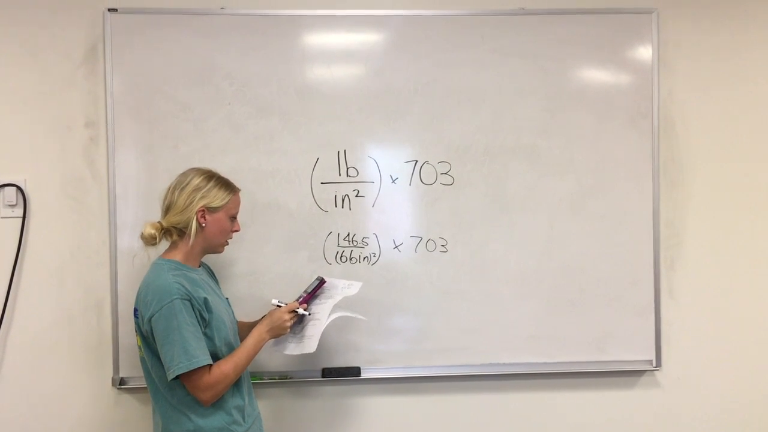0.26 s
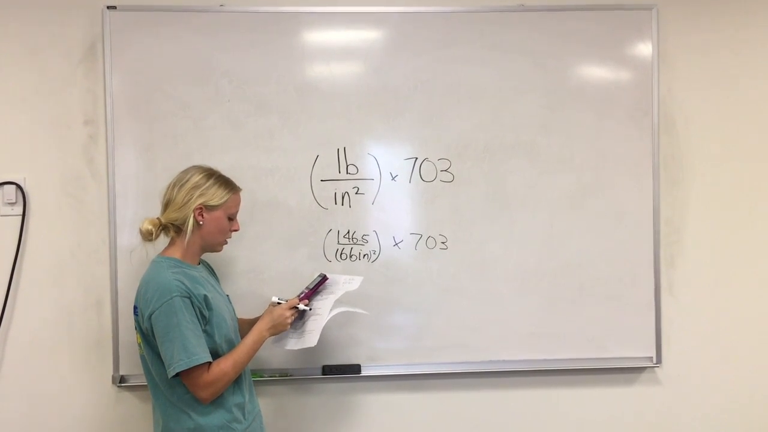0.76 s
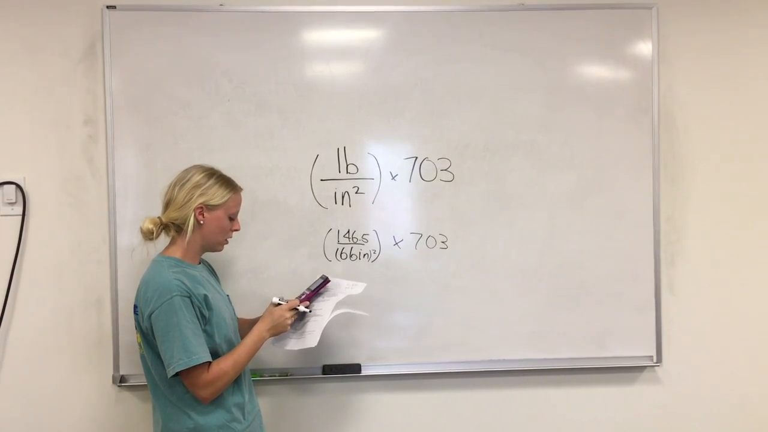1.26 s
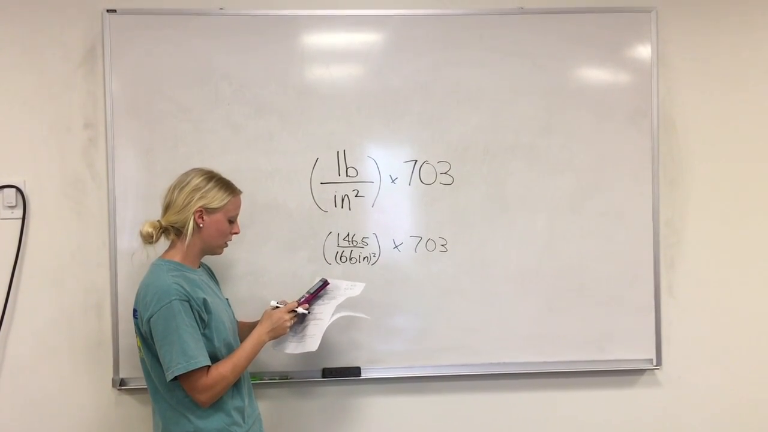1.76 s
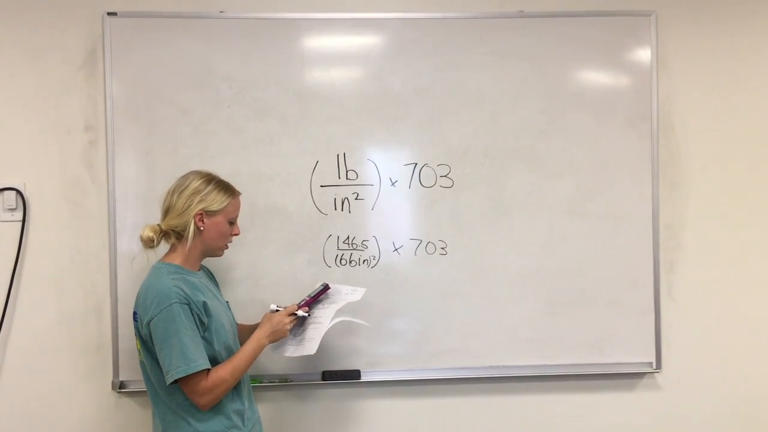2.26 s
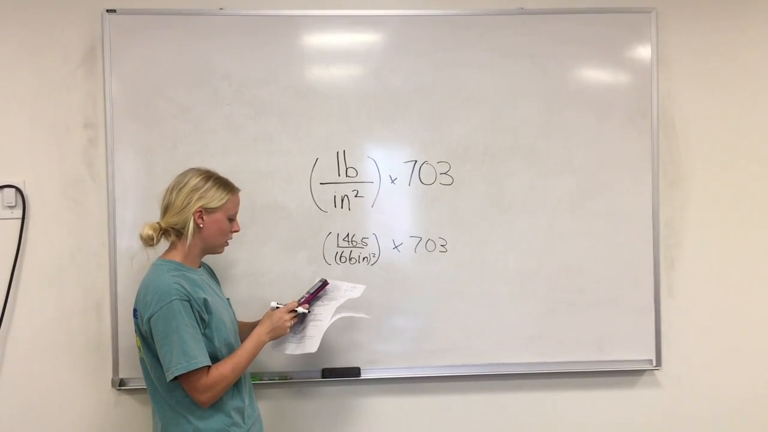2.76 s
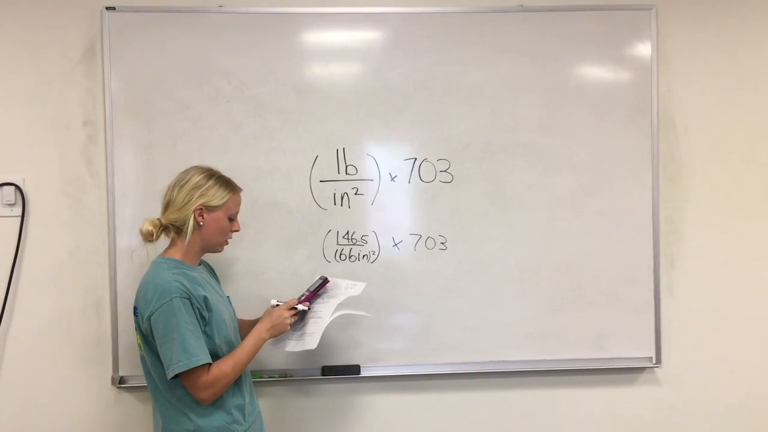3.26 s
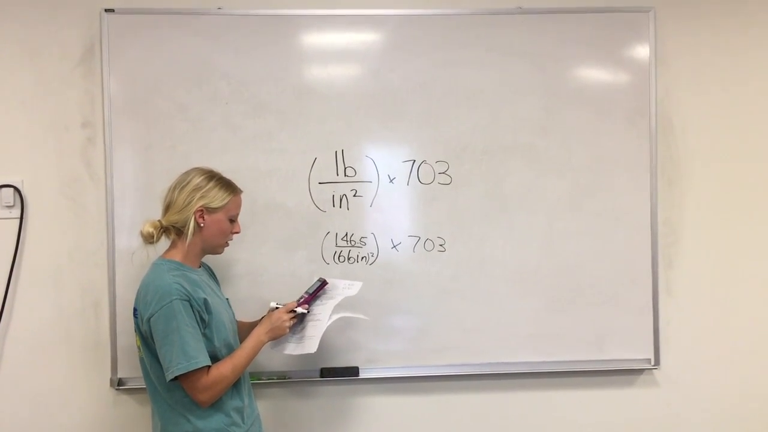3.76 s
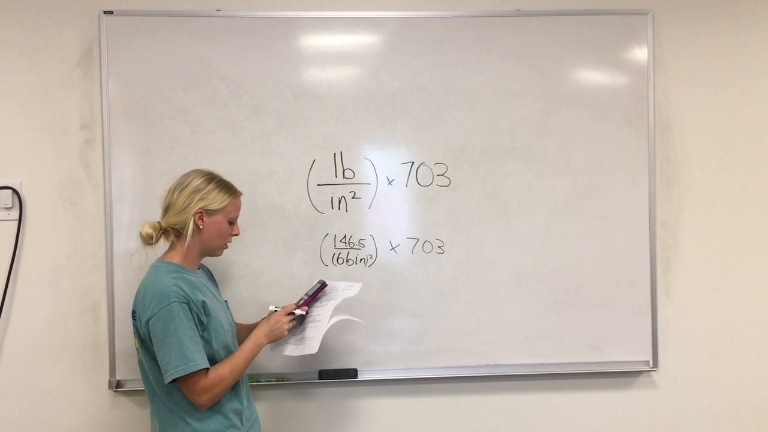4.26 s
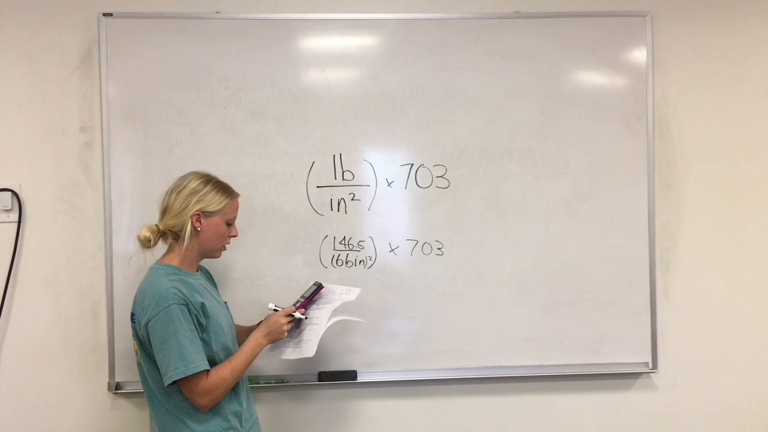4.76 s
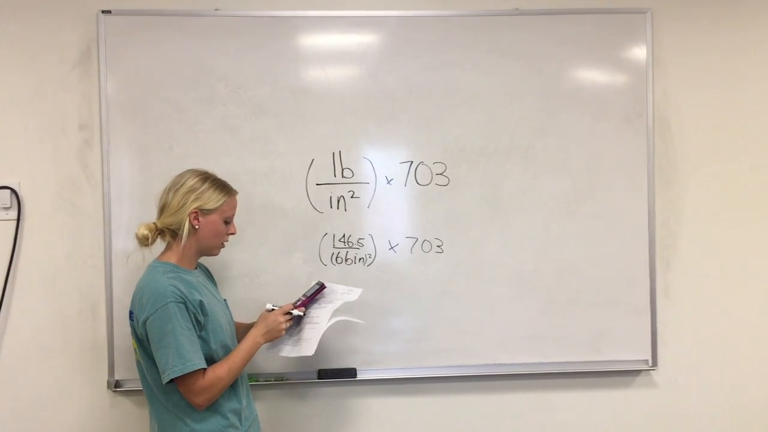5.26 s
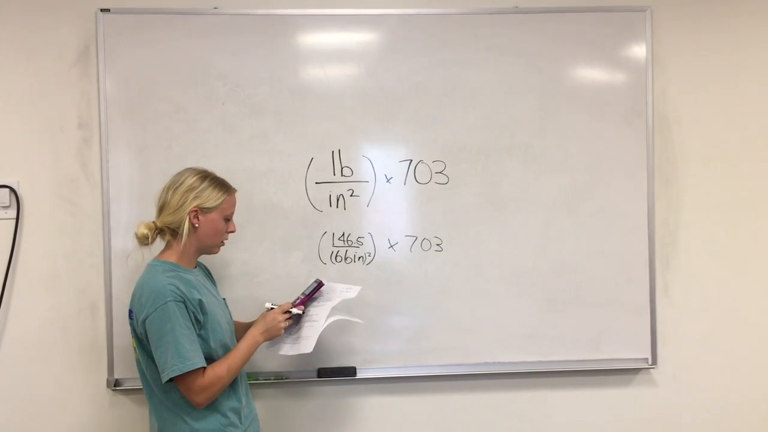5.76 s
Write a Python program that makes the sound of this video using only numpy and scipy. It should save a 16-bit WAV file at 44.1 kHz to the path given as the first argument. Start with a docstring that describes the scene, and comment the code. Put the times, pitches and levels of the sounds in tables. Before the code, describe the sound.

Quick, even tick-tock of a nearby clock, with a low hum and soft room noise underneath.

```python
"""A mechanical clock in a quiet room

The clock ticks 200 times a minute, close by, over the room's low hum, rumble and soft noise.
Each beat is three impacts of the escapement (unlock, impulse, drop), which excite the damped modes
of the same case and works. The two pallets take turns, tick and tock; faint dry clicks fall between."""
import sys
import numpy as np
from scipy import signal
from scipy.fft import rfft, irfft, next_fast_len
from scipy.io import wavfile

SR = 44100
rng = np.random.default_rng(int(sys.argv[2]) if len(sys.argv) > 2 else 0)


def int16_out(signal):
    """Quantize to a 16-bit WAV file."""
    q = np.round(np.clip(np.atleast_2d(signal).T, -1, 1) * 32767)
    wavfile.write(sys.argv[1], SR, q.astype(np.int16))


N = 265282
RING = 8192  # samples in one impact's ring
AGE = np.arange(RING) / SR  # time since the impact, t/s


def undb(db):
    """Amplitude ratio of a level in decibels."""
    return 10 ** (np.asarray(db) / 20)


def unit(x, span_s=np.inf):
    """Normalisation to unit rms over the first span_s seconds."""
    return x / np.sqrt(np.mean(x[np.arange(len(x)) / SR < span_s] ** 2))


def bins(size):
    """Fourier frequencies f/Hz, floored at 1 Hz."""
    return np.maximum(np.arange(size // 2 + 1) * SR / size, 1)


def colour(points, hz):
    """Spectral envelope: gain through (f/Hz, level/dB) points on a log-frequency axis."""
    f, db = np.transpose(points)
    return undb(np.interp(np.log(hz), np.log(f), db))


def noise(gain, size):
    """Gaussian noise shaped by a gain per frequency."""
    return irfft(rfft(rng.standard_normal(size)) * gain, size)


def fade(t60):
    """Exponential free decay, 60 dB in t60 seconds."""
    return np.exp(-np.log(1000) * AGE / t60)


def add(out, s, sound):
    """Superposition of a sound starting at time s."""
    start = max(int(s * SR), 0)
    part = out[start:start + len(sound)]
    part += sound[:len(part)]


def lift(x, hz, width_hz, db):
    """A second-order resonance strengthens or weakens one band."""
    return x + (undb(db) - 1) * signal.lfilter(*signal.iirpeak(hz, hz / width_hz, SR), x)


def three_bands(x, edges_hz=(1150, 4500)):
    """Complementary filters separate bass, middle and treble."""
    bass, below_treble = [1 / (1 + (bins(RING) / edge) ** 16) for edge in edges_hz]
    return irfft(rfft(x) * np.array([bass, below_treble - bass, 1 - below_treble]), RING)


def air(rms_db=-50):
    """Stationary broadband noise of the room, falling towards the treble."""
    # noise spectrum: f/Hz, relative level/dB
    spectrum = [(59, -28), (100, -1.5), (206, -8.5), (335, -11), (433, -19.5), (481, -22), (621, -21.5),
                (705, -21), (1150, -24.5), (1610, -32), (3050, -37.5), (4870, -41.5), (5420, -40.5),
                (11600, -44), (16000, -47.5)]
    return undb(rms_db) * unit(noise(colour(spectrum, bins(N)), N))


def diffuse_air():
    """Partial coherence: above the bass, the room noise differs between left and right."""
    # side relative to mid: f/Hz, level/dB
    room_side = [(100, -55), (200, -44), (380, -27), (1290, -25), (2380, -25), (4400, -27), (8120, -33),
                 (15000, -32)]
    side = irfft(rfft(air()) * colour(room_side, bins(N)), N)
    return np.array([side, -side])


def hum(hum_hz=59.2, hum_db=-42.5):
    """Interference: a steady low tone beats against narrow bands of rumble."""
    # low room resonances: f/Hz, bandwidth/Hz, rms level/dB
    resonances = [(43, 6.6, -60), (54.3, 6.5, -48.5), (84, 6.3, -49), (106.2, 7.3, -58.5)]
    hz = bins(N)
    rumble = sum(undb(db) * unit(noise(1 / (1 + ((hz - f) / width * 1.34) ** 2), N))
                 for f, width, db in resonances)
    return rumble + undb(hum_db) * np.sin(2 * np.pi * (hum_hz * np.arange(N) / SR + rng.random()))


def room_tail(x, t60=.55):
    """Reverberation: faint, dull reflections decay exponentially, independently in each channel."""
    # room response: f/Hz, level/dB
    response = [(120, -16), (220, -7), (400, -11), (700, -26), (2000, -31), (5000, -36), (15000, -42)]
    size = next_fast_len(N + SR, True)
    age = np.arange(SR) / SR
    walls = rng.standard_normal((2, SR)) * np.exp(-np.log(1000) * age / t60)
    walls /= np.linalg.norm(walls, axis=1, keepdims=True)
    return irfft(rfft(x, size) * rfft(walls, size) * colour(response, bins(size)), size)[:, :N]


def spread(x, side_db=.2, ripple_s=.000657, scatter_db=-5, scatter_t60=.05):
    """Phase differences and scattering from nearby surfaces widen the sound; the bass stays centred."""
    # spectrum of the left-right difference: f/Hz, relative level/dB
    clock_side = [(190, -23), (300, -13), (520, -12), (700, -22), (950, -16), (1500, -17), (1950, -26),
                  (2900, -9), (3500, -14.5), (5500, -13), (8500, -18), (13000, -8), (16000, -13)]
    size = next_fast_len(N + RING, True)
    hz = bins(size)
    lead = 1j * np.sqrt(2) * np.sin(2 * np.pi * hz * ripple_s)
    scatter = rng.standard_normal(RING) * fade(scatter_t60)
    paths = lead + undb(scatter_db) * rfft(scatter / np.linalg.norm(scatter), size)
    side = irfft(rfft(x, size) * paths * undb(side_db) * colour(clock_side, hz), size)[:N]
    return np.array([x + side, x - side])


def dry_clicks(t60=.072, rise_s=.00035, trim_db=2.5):
    """Broadband transients: quickly decaying noise makes small bright clicks with no body."""
    # clicks: t/s, relative level/dB
    clicks = [(0.1448, -49), (1.151, -56.5), (1.3135, -59), (2.038, -54), (2.064, -57), (2.3585, -52.5),
              (3.488, -51.5), (3.74, -56), (4.02, -58.5), (4.453, -51.5), (4.6402, -51.5), (5.029, -54),
              (5.641, -54), (5.805, -49), (6.007, -50.5)]
    # their spectrum: f/Hz, relative level/dB
    spectrum = [(500, -16), (1200, -5.5), (2100, 7), (3000, -1.5), (4500, 0.5), (6000, 2), (7500, -2),
                (9500, -3), (11500, -11), (14000, -7), (16000, -10)]
    out = np.zeros(N)
    for s, db in clicks:
        click = noise(colour(spectrum, bins(RING)), RING) * fade(t60) * (1 - np.exp(-AGE / rise_s))
        add(out, s, undb(db + trim_db) * unit(click, span_s=.0039))
    return out


def works_ring(pallet, low_t60=.18, high_t60=.08, chatter_db=2, chatter_hz=1100):
    """Modal overlap: dense modes merge into noise that flutters as steel chatters; the highs die first."""
    # resonances of plates and wheels: f/Hz, relative level/dB
    spectrum = [(300, -20.5), (480, -15), (700, 2.5), (1100, -1.5), (2200, -7), (3000, -15), (4600, -12),
                (5500, -20), (6600, -20.5), (8000, -25.5), (11000, -25), (16000, -33)]
    # bright rings of steel parts: f/Hz, bandwidth/Hz, tick lift/dB, tock lift/dB
    steel = [(6320, 200, -1, -1.5), (6400, 350, 0, 7.5), (6970, 200, 1, 7.5), (9220, 560, 6, 7),
             (11000, 710, -0.5, 5.5), (12920, 1800, 6.5, 6), (14500, 820, 10, 11)]
    hz = bins(RING)
    lift_db = sum(db[pallet] / (1 + (2 * (hz - f) / width) ** 2) for f, width, *db in steel)
    chatter = undb(chatter_db * np.tanh(unit(noise(hz < chatter_hz, RING))))
    contact = rfft(rng.standard_normal(RING) * chatter)
    bass, middle, treble = three_bands(irfft(contact * colour(spectrum, hz) * undb(lift_db), RING))
    return unit((bass + middle) * fade(low_t60) + treble * fade(high_t60))


def case_ring(pallet, soft_hz, scatter_db=2.76, detune=.0021):
    """Modal superposition: damped sinusoids, varied at each blow; soft contact favours the low modes."""
    # case modes: f/Hz, relative tick level/dB, relative tock level/dB, free T60/s
    modes = [(572.6, -17.5, -21.5, 0.24), (687.4, -2, -0.5, 0.28), (737, -1.5, -3, 0.18),
             (807.6, -4.5, -3.5, 0.18), (850, -2, -3.5, 0.21), (940, -4.5, -4.5, 0.23),
             (1030, -8.5, -6, 0.33), (1200, -11.5, -11.5, 0.15), (1272, -18, -11, 0.32),
             (1373, -8.5, -11.5, 0.31), (1416, -7.5, -9.5, .2), (1515, -6.5, -4.5, .17),
             (1588, -6, -5, 0.1), (1653, -6.5, -11, 0.15), (1799, -3.5, -5, 0.16), (1954, -25, -8, 0.087),
             (2060, 2.5, 5, 0.082), (2458, -8, -5.5, 0.08), (2647, -8, -10, 0.074), (2900, -6.5, -18, 0.09),
             (3368, -4.5, -7.5, 0.14), (3500, -8, -14, 0.055), (3580, -8.5, -10.5, 0.12),
             (3892, -17, -17.5, 0.13), (4030, -23, -20, 0.2), (4180, -14, -18, 0.098),
             (4420, -16.5, -18, 0.085), (4620, -20, -17, 0.12), (4770, -18, -23, .14), (5160, -31, -21, .2),
             (5920, -24, -20, 0.15), (6500, -17, -25, 0.12), (6970, -21, -19, 0.11)]
    hz, *pallet_db, t60 = np.transpose(modes)[:, :, None]
    strength, drift, phase = rng.standard_normal((len(modes), 3)).T[:, :, None]
    softness = 1 + 2 / (1 + (hz / soft_hz) ** 10)
    gain = softness * undb(pallet_db[pallet] + scatter_db * strength)
    cycles = hz * (1 + detune * drift) * AGE + phase
    return unit(np.sum(gain * fade(t60) * np.sin(2 * np.pi * cycles), axis=0))


def impacts(blows, pallet_db, works_db, rise_s, snap_s, crack_db, trim_db,
            damp_t60=1, soft_hz=300, span_s=.012, crack_s=.0034, ping_hz=4600):
    """Impact excitation, pallet by pallet: the treble cracks at once, the lower bands swell after it."""
    out = np.zeros(N)
    alike = .75  # share of the works' power that repeats at each blow on a pallet
    voices = [works_ring(pallet) for pallet in range(len(pallet_db))]
    swell = 1 - np.exp(-AGE / rise_s)
    crack = (1 - np.exp(-AGE / snap_s)) * undb(crack_db * np.exp(-(AGE / crack_s) ** 2))
    envelopes = np.array([swell, swell, crack]) * fade(damp_t60) * (1 - AGE / AGE[-1])
    for beat, (s, strength_db, ping_db, snap_db) in enumerate(blows):
        pallet = beat % len(pallet_db)
        works = np.sqrt(alike) * voices[pallet] + np.sqrt(1 - alike) * works_ring(pallet)
        bands = three_bands(case_ring(pallet, soft_hz) + undb(works_db) * works) * envelopes
        blow = sum(undb(db + strength_db + trim_db) * unit(band, span_s)
                   for db, band in zip(pallet_db[pallet], bands))
        blow = lift(blow, ping_hz, width_hz=350, db=ping_db)  # metallic ping
        blow = lift(blow, 12900, width_hz=2600, db=snap_db)  # glassy snap
        add(out, s, blow)
    return out


def escapement(period_s=.5989, ease_db_per_s=-.45, ping_db=(3, -3), snap_db=(-2, -1), push_snap_db=-1):
    """A balance oscillator unlocks each pallet once a period; contact with a tooth damps the ring."""
    # beats, no two teeth alike, tick and tock in turn:
    # drop t/s, strength/dB, ping/dB, snap/dB, impulse t/s, strength/dB
    beats = [(0.0799, 1.8, -5, 3, 0.0664, .5), (0.3719, -.3, -2, 7, 0.3555, 1.2),
             (0.6797, -.2, -1, -1, 0.6661, -.7), (0.9711, .8, 2, 5, 0.9543, 1),
             (1.2783, 0, -4, -1, 1.2664, -.3), (1.571, .7, 3, 3, 1.5523, 1.7),
             (1.8779, -.3, -.5, 0, 1.8645, -1), (2.1682, .3, -4, 0, 2.1513, .5),
             (2.4766, .5, 0, -2, 2.4636, .8), (2.7659, .5, -3, 1, 2.7491, -.8),
             (3.0752, 1.6, 0, -2, 3.0602, 1.5), (3.3663, .8, 2, 2, 3.3495, .5),
             (3.6737, -.2, 5, 1, 3.6603, -1), (3.9654, .8, 1, 6, 3.9486, -.8),
             (4.2728, .3, 3, 4, 4.2628, 4), (4.5648, -1, 2, -2, 4.5469, -3),
             (4.8738, -1.8, 7, 0, 4.8621, -.5), (5.1639, -1.7, -2, 3, 5.1496, -1),
             (5.4724, -2.7, 3, 0, 5.4433, -7), (5.7623, -1, -4, -1, 5.7453, 0)]
    # a pallet releases a tooth; rows tick, tock: relative bass, middle, treble level/dB
    unlock_db = [(-46.4, -48.2, -54.2), (-44.3, -42, -48.4)]
    # the tick pallet scrapes just afterwards: same columns
    scrape_db = (-45.5, -50, -58)
    # the tooth gives the pallet a dull push: same columns
    impulse_db = [(-34, -36.5, -45.1), (-32, -42.5, -46)]
    # the next tooth lands, the loudest blow: same columns
    drop_db = [(-31.2, -30.9, -45.5), (-27.3, -28.6, -43.3)]
    first_unlock_s = (.039, .325)  # slightly out of beat: the tock comes early
    unlock_s = [first_unlock_s[beat % 2] + beat // 2 * period_s for beat in range(len(beats))]
    unlocks = [(s, ease_db_per_s * (s - np.mean(unlock_s)), ping_db[beat % 2], snap_db[beat % 2])
               for beat, s in enumerate(unlock_s)]  # slowly growing lighter
    scrapes = [(s + .012, *touch) for s, *touch in unlocks[::2]]
    pushes = [(*row[4:], 0, push_snap_db) for row in beats]
    drops = [row[:4] for row in beats]
    unlock = impacts(unlocks, unlock_db, works_db=-1, rise_s=.0016, snap_s=.00027, crack_db=1.5,
                     trim_db=-4)
    scrape = impacts(scrapes, [scrape_db], works_db=0, rise_s=.006, snap_s=.0006, crack_db=5,
                     trim_db=-4, damp_t60=.59)
    impulse = impacts(pushes, impulse_db, works_db=-7.5, rise_s=.0013, snap_s=.0008, crack_db=7.5,
                      trim_db=-4.5, soft_hz=920)
    drop = impacts(drops, drop_db, works_db=-4.5, rise_s=.0014, snap_s=.0005, crack_db=2.5,
                   trim_db=-4.77, damp_t60=.39, span_s=.02, ping_hz=3470)
    return unlock + scrape + impulse + drop


def scene(left_db=.35):
    """Direct and diffuse fields add; a level difference sets the clock just left of the middle."""
    near = escapement() + dry_clicks()
    direct = spread(near) * undb([[left_db / 2], [-left_db / 2]])
    return direct + diffuse_air() + room_tail(near) + air() + hum()


def record(dry, top_hz=15950):
    """Band limiting: a steep elliptic low-pass removes the highest treble."""
    return signal.sosfilt(signal.ellip(10, .2, 70, top_hz, fs=SR, output="sos"), dry)


dry = scene()
out = record(dry)
int16_out(out)
```